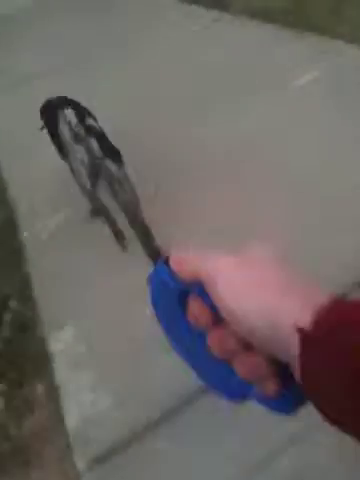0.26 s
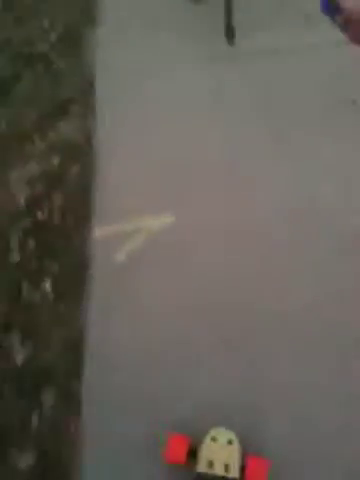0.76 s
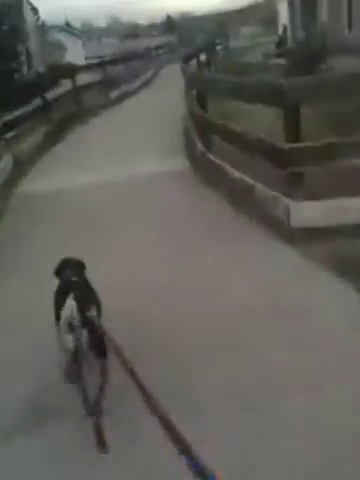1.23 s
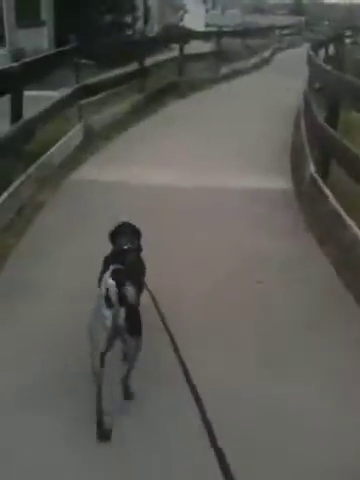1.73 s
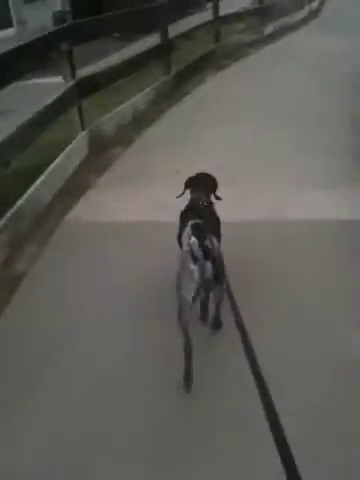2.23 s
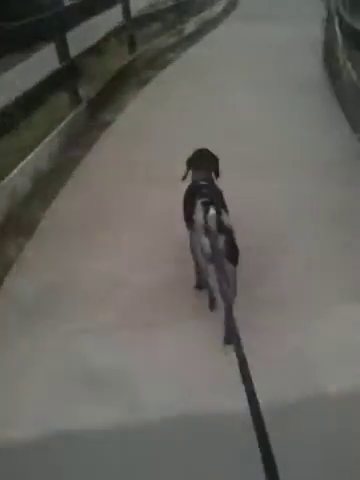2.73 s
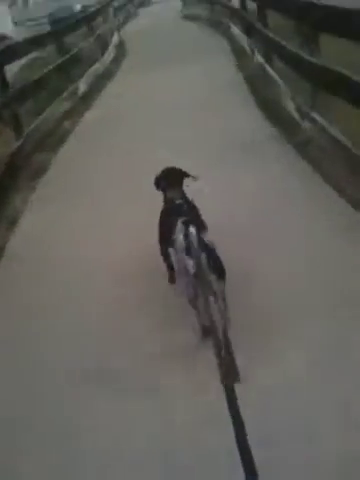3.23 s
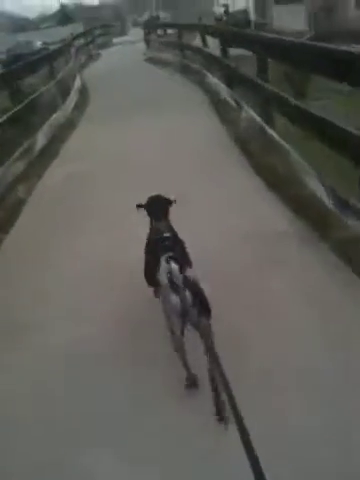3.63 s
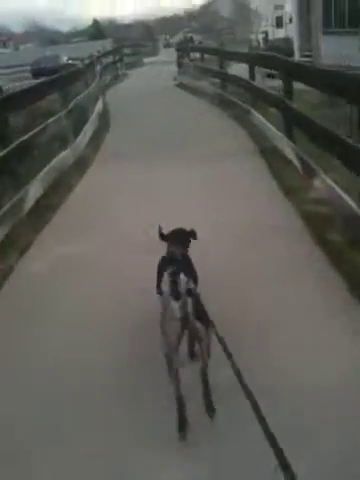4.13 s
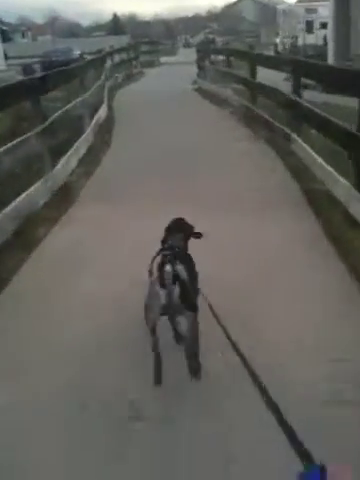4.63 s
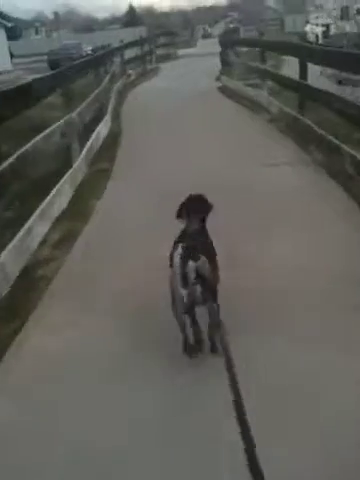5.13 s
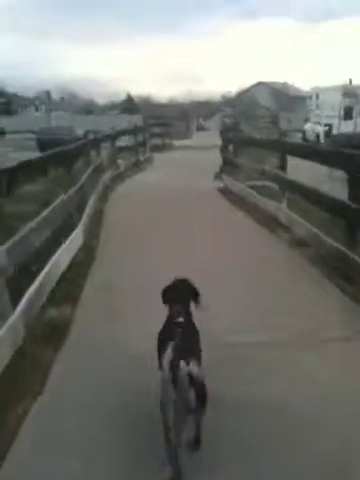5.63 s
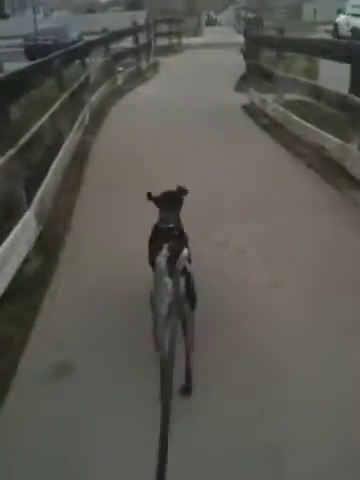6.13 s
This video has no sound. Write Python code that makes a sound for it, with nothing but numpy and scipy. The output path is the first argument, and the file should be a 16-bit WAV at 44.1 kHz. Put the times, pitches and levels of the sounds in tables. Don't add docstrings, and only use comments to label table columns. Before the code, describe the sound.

A microphone worn by the rider hears a longboard on an outdoor concrete path. The first second is crowded with hollow deck knocks, rattling trucks, flung grit and sharp plastic clicks from a reel lead. Then the roll calms to a low wooden hum with growl and hiss, broken by paired joint knocks that grow stronger after four seconds, with faint shoe scuffs and tiny collar tag ticks.

```python
import sys
import numpy as np
from scipy import signal
from scipy.fft import rfft, irfft, next_fast_len
from scipy.io import wavfile
from scipy.ndimage import uniform_filter1d, map_coordinates

SR = 44100
rng = np.random.default_rng(int(sys.argv[2]) if len(sys.argv) > 2 else 0)


def rack_gain(trim_db):
    fader = np.asarray(trim_db, float)
    return 10 ** (fader / 20)


def pcm_store(signal):
    levels = np.round(np.clip(np.atleast_2d(signal), -1, 1) * 32767)
    wavfile.write(sys.argv[1], SR, levels.astype(np.int16).T)


N = 281358

# time in seconds, roughness of the concrete in dB, wheel spin in dB.
ROLL_COURSE = [(0.0, -36.5, -55), (0.6, -39, -55), (0.78, -44.5, -60), (1.0, -45, -53), (1.2, -45.5, -55),
               (1.42, -47.5, -68.5), (1.72, -46, -62), (2.06, -42.5, -63.5), (2.63, -44.5, -62.5),
               (3.07, -42, -60), (3.66, -43, -61), (4.09, -43.5, -57.5), (4.67, -40, -58.5),
               (5.0, -41.5, -56), (5.65, -38.5, -55), (6.09, -44, -59), (6.38, -44.5, -55.5)]
# pitch in Hz, width in Hz, level in dB.
BEND_MODES = [(160.6, 41, 0), (240, 75, -2), (283.7, 36, -0.5), (380, 60, -4)]
# pitch in Hz, width in Hz, level in dB.
TWIST_MODES = [(476.4, 61.7, 1.5), (601, 139, -0.5), (756, 493, -3.5), (1032, 1320, -9.5)]
# pitch in Hz, width in Hz, level in dB.
TRUCK_MODES = [(1610, 360, -0.5), (2106, 190, -2), (2253, 190, -0.5), (2796, 178, 0), (3140, 400, -6.5),
               (5700, 2200, -13.5)]
# frequency in Hz, level in dB per Hz.
TYRE_SPECTRUM = [(290, -16), (500, -17), (595, -3.5), (884, -0.5), (1100, -6), (1400, -9.5), (2760, -11),
                 (4500, -17.5), (5850, -48), (9900, -120)]
# frequency in Hz, level in dB per Hz.
BEARING_SPECTRUM = [(3000, -21), (4200, 1), (5200, 4), (6200, 7), (7600, 4), (9500, -28), (13000, -14.5)]
# frequency in Hz, level in dB per Hz.
AIR_SPECTRUM = [(1470, -20), (2500, 1), (2770, 2.5), (3890, -17), (8270, -1), (15200, -7), (16000, 2)]
# start in seconds, peak in dB, brightness in dB, case pitch in Hz.
LOCK_CLICKS = [(0.023, -43, 6, 1880), (0.0454, -24.5, 1.5, 1550), (0.0684, -36.5, 14, 1660),
               (0.1643, -34.5, -3, 1600), (0.1742, -33.5, 3, 2300), (0.201, -45, -4, 1580),
               (0.229, -21, 6.5, 1560), (0.9132, -33, 8, 1420), (1.3782, -39, 7, 1920),
               (1.4, -46, -17, 1700), (1.499, -65, 22.5, 1440), (1.54, -37, -0.5, 1565),
               (2.1137, -37.5, -9, 1590), (2.1894, -31.5, 7, 1530), (5.1504, -49, -15, 1240),
               (6.1911, -23, 8.5, 1504)]
# multiple of the case pitch, level in dB, T60 in seconds.
CASE_MODES = [(1, 20.5, 0.012), (.92, -6, 0.048), (1.36, 6.5, 0.016), (2, 1.5, 0.019), (2.2, 5.5, 0.011),
              (.3, 0, 0.023)]
# pitch in Hz, level in dB, T60 in seconds.
CATCH_MODES = [(4500, 0, .013), (5050, -1, .013), (6200, -1, .011), (6750, -4, .012), (8300, -2, .01),
               (9700, -5, .009), (11500, -5, .009)]
# start in seconds, peak in dB, pitch
# in Hz.
BRIGHT_BURSTS = [(0.024, -19, 4220), (0.0497, -16.5, 4860), (0.0676, -26, 6950), (.091, -48, 4260),
                 (0.137, -43, 7090), (0.1722, -20, 4010), (0.228, -42, 4050), (0.306, -37, 4570),
                 (.828, -43, 4920), (.9138, -25, 8900), (1.3982, -34, 7180), (1.5396, -31.5, 6400),
                 (1.8342, -37, 6900), (2.0951, -38, 8620), (2.1116, -32, 6300), (2.535, -39, 7000),
                 (3.0975, -34, 6460), (3.3987, -38, 8200), (3.553, -36, 6540), (3.7912, -25.5, 6700),
                 (4.0163, -27, 7450), (3.7309, -39, 5920), (4.2662, -27.5, 5870), (4.5753, -33, 6440),
                 (5.4201, -31, 5820), (5.914, -43, 5060), (6.0673, -27, 4900), (6.1686, -28.5, 6560),
                 (6.1908, -19, 4950), (6.327, -32.5, 5800)]
# start in seconds, deck peak in dB, edge hardness in dB, pitch in Hz.
JOLTS = [(0.026, -23.5, -17.5, 141), (0.045, -24.5, -7, 298), (0.061, -22.5, -17.5, 415),
         (.086, -24, -8.5, 282), (0.101, -29.5, -13.5, 355), (0.143, -21.5, -26, 464),
         (.184, -29, -21, 380), (0.269, -26.5, -14.5, 336), (0.288, -26.5, -11, 420), (.437, -22, -12, 396),
         (0.523, -17.5, -11.5, 380), (0.594, -17.5, -18, 272), (0.603, -13, -13, 322),
         (0.615, -29, -15, 423), (.629, -24.5, -20, 370), (0.709, -26.5, -11, 457), (.724, -30.5, -9, 386),
         (0.748, -31, -14, 380), (.804, -17, -21.5, 426), (0.817, -24.5, -17, 320), (.895, -19.5, -11, 201),
         (.913, -24, -16.5, 250), (.941, -13.5, -15.5, 287), (.956, -23, -16.5, 413), (.967, -29, -33, 265),
         (.992, -24.5, -30, 175)]
# start in seconds, deck peak in dB, edge hardness in dB.
COARSE_RIDGES = [
    (.257, -36, -8),
    (.305, -21, -9),
    (.314, -41, -14),
    (.322, -22.5, -12),
    (.328, -21.5, -12),
    (.342, -27, -17),
    (.348, -21.5, -16),
    (.357, -22.5, -14),
    (0.37, -27.5, -16),
]
# start in seconds, first wheel in dB, second wheel in dB,
# lag of the second in seconds, edge hardness in dB.
SLAB_JOINTS = [(1.377, -32.5, -30, 0.018, -11), (1.64, -28, -24, 0.017, -15),
               (1.944, -21, -20.5, .009, -14), (2.2, -22, -20.5, 0.021, -17), (2.608, -30, -24, 0.0064, -9),
               (3.182, -39, -34.5, .012, -11.5), (3.788, -21.5, -29.5, 0.0095, -14.5),
               (4.01, -29, -25, 0.0098, -11), (4.461, -17, -23, .012, -9.5),
               (4.675, -14, -17.5, 0.016, -16.5), (5.11, -18.5, -23, .005, -6.5),
               (5.314, -18.5, -26, 0.0096, -8.5), (5.742, -19, -16.5, 0.0049, -12),
               (5.935, -19.5, -19, 0.016, -12)]
# start in seconds, deck peak in dB, edge hardness in dB, pitch in Hz.
STONES = [
    (1.815, -33, -17.5, 390),
    (2.848, -21, -21, 240),
    (2.96, -34, -28, 230),
    (3.323, -38.5, -11.5, 147),
    (3.548, -26.5, -18.5, 376),
    (4.6, -30, -35, 370),
    (4.871, -30, -45, 393),
]
# start in seconds, length in seconds, level in dB.
SHOE_STROKES = [
    (.53, 0.19, -38),
    (1.075, 0.217, -39.5),
    (3.739, 0.078, -48.5),
    (4.129, 0.14, -45),
    (4.522, 0.17, -48),
    (5.398, 0.099, -48.5),
    (5.795, 0.071, -46),
    (6.184, 0.18, -47),
]
# frequency in Hz, level in dB per Hz.
SOLE_SPECTRUM = [(530, -47), (900, -13), (944, -6), (1490, -6.5), (2900, -13.5), (4500, -7.5),
                 (6000, -14.5), (7960, -9.5), (16000, -18.5)]
# start in seconds, peak in dB, pitch in Hz.
TAG_TICKS = [
    (2.333, -46.5, 6860),
    (2.36, -47.5, 4000),
    (2.4536, -48, 7680),
    (2.727, -49, 6750),
    (3.5674, -58, 5300),
    (3.8575, -51.5, 11500),
]
# frequency in Hz, level in dB per Hz.
WIND_SPECTRUM = [(12, -55), (20, -31), (43, -35.5), (107, -12.5), (140, -8), (180, -29), (310, -120)]

TYRE_DB, BEARING_DB, AIR_DB = -7, -1, 3.5
TYRE_ROUGH_SHARE, AIR_SPIN_SHARE = 0.56, 0.41
HUM_HZ, HUM_DB = 413, -7
FIRST_HZ, SECOND_HZ, PITCH_HZ_PER_DB = 302, 353, 1
SOFTER_DB = 3
JOINT_T60_S, RIDGE_T60_S, STONE_T60_S, JOLT_T60_S, BURST_T60_S = 0.089, 0.06, 0.12, 0.11, 0.046
RIDGE_HZ = 370
PUSH = 1.24
TWIST_DB, TWIST_HARD_SHARE = -2, 0.74
RATTLE_LAG_S, SAND_LAG_S = 0.001, 0.004
SAND_DB, SAND_HZ = 7.5, 5840
BUZZ_DB, BUZZ_T60_S = -25.5, 0.52
CHATTER_DB = 53
LAND_SHARE, FIRMNESS = 0.33, 1.97
MIC_BEND = 0.15
GUST_DB = 2.5


def unit(x):
    return x / np.sqrt(np.mean(x ** 2) + 1e-20)


def curves(rows):
    s, *cols = np.transpose(rows)
    return [np.interp(np.arange(N) / SR, s, c) for c in cols]


def wobble(rate_hz):
    knots = rng.standard_normal(int(N * rate_hz / SR) + 4)
    return map_coordinates(knots, [np.arange(N) * rate_hz / SR])


def filtered(x, response):
    m = next_fast_len(len(x) + 4096)
    return irfft(rfft(x, m) * response(np.fft.rfftfreq(m, 1 / SR)), m)[:len(x)]


def body(modes):
    return lambda f: sum((-1) ** k * rack_gain(db) * 1j * f * w / (c * c - f * f + 1j * f * w)
                         for k, (c, w, db) in enumerate(modes))


def plank(modes):
    return lambda f: body(modes)(f) / (1 + 1j * f / 1100) ** 2


def colour(points):
    hz, db = np.transpose(points)
    return lambda f: rack_gain(np.interp(np.log(f + 1), np.log(hz), db))


def grit(spread_db):
    return rack_gain(spread_db * rng.exponential(size=N)) * rng.standard_normal(N)


def mottled(x, patchy_db):
    z = signal.stft(x, nperseg=512)[2]
    field = uniform_filter1d(rng.standard_normal(z.shape), size=7, axis=0)
    field = uniform_filter1d(field, size=6, axis=1)
    return unit(signal.istft(rack_gain(patchy_db * unit(field)) * z, nperseg=512)[1][:N])


def add(track, s, sound, peak_db):
    track[round(s * SR):][:len(sound)] += rack_gain(peak_db) * sound / np.abs(sound).max()


def rolling():
    deck_db, spin_db = curves(ROLL_COURSE)
    mean_db = spin_db.mean()
    tyre_db = TYRE_DB + TYRE_ROUGH_SHARE * deck_db + (1 - TYRE_ROUGH_SHARE) * mean_db
    air_db = AIR_DB + AIR_SPIN_SHARE * spin_db + (1 - AIR_SPIN_SHARE) * mean_db
    patch = wobble(3.3)

    def humming(f):
        return plank(BEND_MODES)(f) * (1 + body([(HUM_HZ, 70, HUM_DB)])(f))

    bend = unit(filtered(rack_gain(0.7 * patch + 0.8 * wobble(40)) * grit(2.5), humming))
    twist = unit(filtered(rack_gain(0.7 * patch + 1.2 * wobble(20)) * grit(1.5), plank(TWIST_MODES)))
    tyre = filtered(rack_gain(0.8 * patch + 1.1 * wobble(30)) * grit(1.8), colour(TYRE_SPECTRUM))
    hiss = filtered(rack_gain(0.8 * patch + 1.1 * wobble(18)) * grit(1.6), colour(BEARING_SPECTRUM))
    air = filtered(rack_gain(1.3 * wobble(14)) * grit(2.3), colour(AIR_SPECTRUM))

    out = rack_gain(deck_db + 1.1) * (bend + rack_gain(-10.0) * twist)
    out += rack_gain(tyre_db) * mottled(tyre, patchy_db=1.6)
    out += rack_gain(spin_db + BEARING_DB) * mottled(hiss, patchy_db=1.6)
    return out + rack_gain(air_db) * mottled(air, patchy_db=1.8)


def lead():
    track, t = np.zeros(N + SR), np.arange(SR // 12) / SR

    def ring(hz, db, t60):
        return rack_gain(db + rng.normal(0, 1.0) - 60 * t / t60) * np.sin(2 * np.pi * hz * t)

    for s, db, bright_db, hz in LOCK_CLICKS:
        case = sum(ring(k * hz, level, t60) for k, level, t60 in CASE_MODES)
        case = case * (1 - np.exp(-t / 0.00096))
        crack = uniform_filter1d(rng.standard_normal(len(t)), size=2) * rack_gain(-60 * t / 0.009)
        catch = sum(ring(c * rng.normal(1, 0.03), level, t60) for c, level, t60 in CATCH_MODES)
        catch = (catch + 2.5 * crack) * (1 - np.exp(-t / 0.0003))
        add(track, s - 0.0011, case, db + 7.0)
        add(track, s - 0.0013, catch, db + bright_db + 0.5)
        add(track, s + 0.0056, case + 0.3 * catch, db - 7)
    return track[:N]


def blows():
    first = [(s, db, hard, FIRST_HZ + PITCH_HZ_PER_DB * (db + 25), JOINT_T60_S)
             for s, db, _, _, hard in SLAB_JOINTS]
    second = [(s + lag, db, hard - SOFTER_DB, SECOND_HZ, JOINT_T60_S)
              for s, _, db, lag, hard in SLAB_JOINTS]
    ridges = [(*row, RIDGE_HZ, RIDGE_T60_S) for row in COARSE_RIDGES]
    stones = [(*row, STONE_T60_S) for row in STONES]
    jolts = [(*row, JOLT_T60_S) for row in JOLTS]
    return first + second + ridges + stones + jolts


def bright_bursts():
    track, t = np.zeros(N + SR), np.arange(SR // 10) / SR
    sand = [(s + SAND_LAG_S, db + hard + SAND_DB, SAND_HZ * rng.normal(1, 0.18), t60)
            for s, db, hard, _, t60 in blows()]
    bursts = [(*row, BURST_T60_S) for row in BRIGHT_BURSTS]
    for s, db, hz, t60 in sand + bursts:
        envelope = (1 - np.exp(-t / 0.00048)) * rack_gain(-60 * t / np.clip(t60, 0.008, 0.2))
        grains = rack_gain(3.94 * rng.exponential(size=len(t))) * rng.standard_normal(len(t))
        spray = filtered(envelope * grains, body([(hz, 0.28 * hz, 0), (8500, 8000, -7)]))
        add(track, s - 0.001, spray, db - 6)
    return track[:N]


def joints():
    track, t = np.zeros(N + SR), np.arange(SR // 6) / SR
    for s, db, hard_db, hz, t60 in blows():
        decay = (1 - np.exp(-t / 0.0026)) * rack_gain(-60 * t / np.clip(t60, 0.015, 0.3))
        shudder = decay * rng.standard_normal((3, len(t)))
        push = PUSH * np.exp(-((t - 0.004) * hz * 8) ** 2)
        bend = filtered(shudder[0] + push,
                        lambda f: plank(BEND_MODES)(f) * (0.5 + body([(hz, 110, 0)])(f)))
        twist = filtered(shudder[1] + 0.47 * push, plank(TWIST_MODES))

        chatter = rack_gain(CHATTER_DB * uniform_filter1d(rng.standard_normal(len(t)), size=81))
        loose = [(c, w, level + rng.normal(0, 2.5)) for c, w, level in TRUCK_MODES]
        buzz = rack_gain(BUZZ_DB - 60 * t / BUZZ_T60_S) * rng.standard_normal(len(t))
        rattle = filtered((shudder[2] + buzz) * chatter, body(loose))

        add(track, s - 0.0015, bend, db + 3.5)
        add(track, s - 0.0015, twist, db + TWIST_DB + TWIST_HARD_SHARE * hard_db + 11)
        add(track, s + RATTLE_LAG_S, rattle, db + hard_db + 5.5)
    return track[:N]


def shoe():
    t = np.arange(N) / SR
    stroke = np.zeros(N)
    for s, length_s, db in SHOE_STROKES:
        u = np.clip((t - s) / (LAND_SHARE * length_s), 0, 30)
        stroke += rack_gain(db - 4) * (u * np.exp(1 - u)) ** FIRMNESS
    return stroke * unit(filtered(grit(1.5), colour(SOLE_SPECTRUM)))


def collar():
    track, t = np.zeros(N + SR), np.arange(SR // 16) / SR
    for s, db, hz in TAG_TICKS:
        touch = rack_gain(-60 * t / 0.047) * rng.standard_normal(len(t))
        add(track, s, filtered(touch, body([(hz, 400, 0), (7000, 5000, -12)])), db + 4.0)
    return track[:N]


def scene():
    return (rolling() + lead() + bright_bursts() + joints() + shoe() + collar())[None]


def low_pass(x):
    return signal.sosfilt(signal.butter(12, 16810, fs=SR, output="sos"), x)


def record(dry):
    heard = filtered(dry[0], lambda f: (1j * f / (130 + 1j * f)) ** 3)
    heard = heard + MIC_BEND * (heard ** 2 - np.mean(heard ** 2))
    wind = unit(filtered(rng.standard_normal(N), colour(WIND_SPECTRUM)))
    wind_db = curves(ROLL_COURSE)[0] - 19.0 + GUST_DB * wobble(11)
    return low_pass(heard + rack_gain(wind_db) * wind)


dry = scene()
out = record(dry)
pcm_store(out)
```